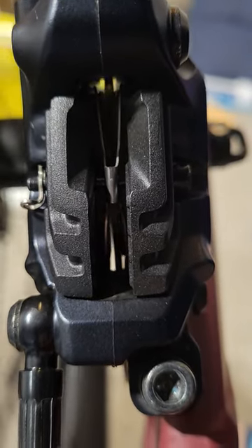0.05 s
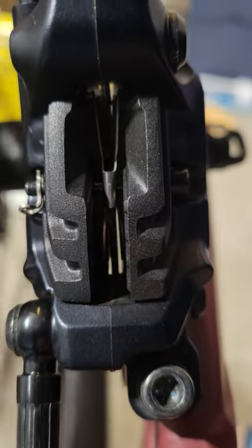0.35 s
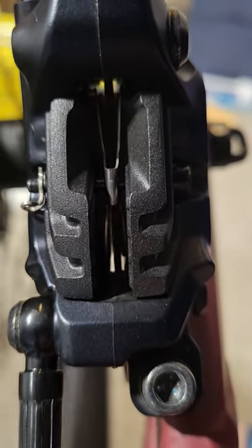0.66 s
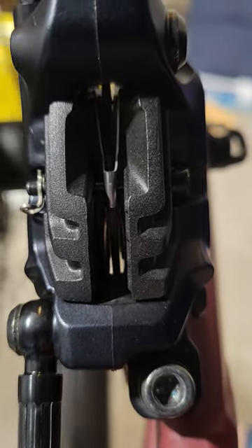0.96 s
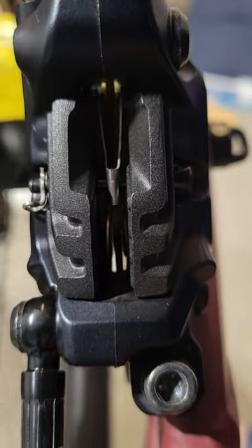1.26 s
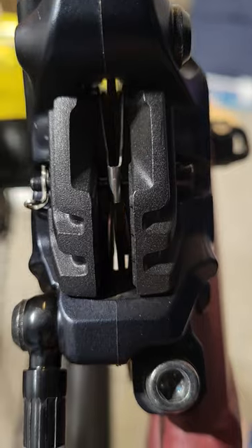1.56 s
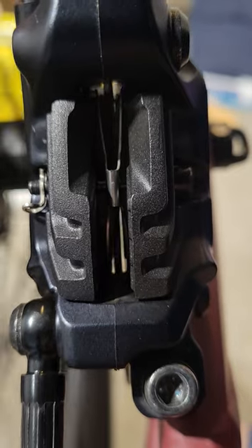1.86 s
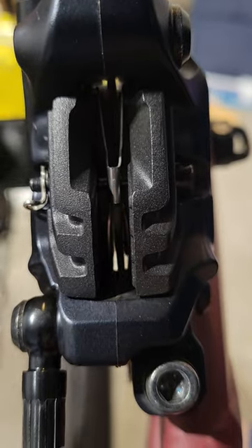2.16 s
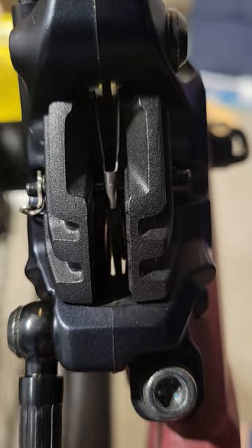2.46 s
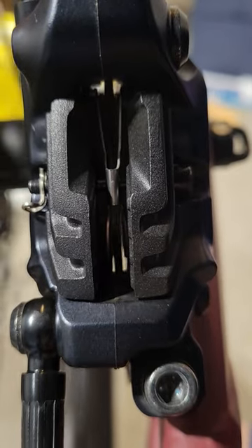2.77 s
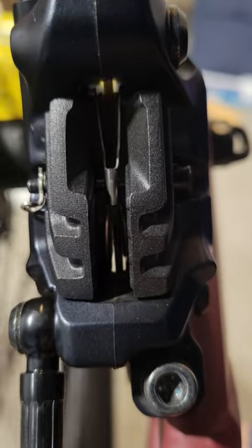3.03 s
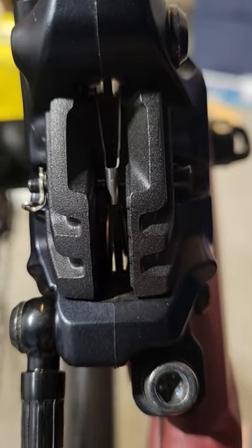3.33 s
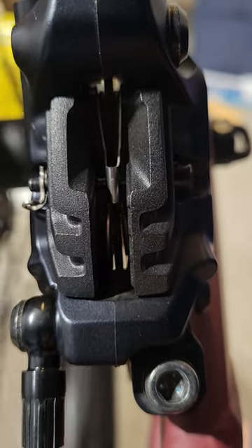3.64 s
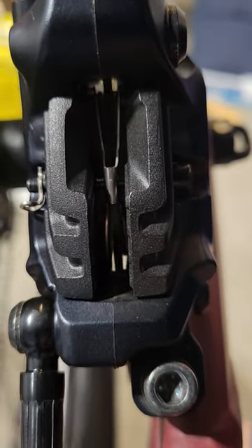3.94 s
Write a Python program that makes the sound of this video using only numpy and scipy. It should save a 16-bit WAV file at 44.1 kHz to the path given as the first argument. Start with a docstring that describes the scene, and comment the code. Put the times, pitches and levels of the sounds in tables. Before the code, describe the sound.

A bicycle freehub ticks rapidly while the brake disc brushes the pads once per turn.

```python
"""A coasting bicycle wheel

A rear wheel slowly loses speed, heard from right beside the brake. Small catches in the hub (pawls)
drop over 18 teeth, each with its own click, in the same pattern on every turn. Once a turn the bent
brake disc brushes the pads with a hiss, and the frame's hum swells. A quiet room lies behind."""
import sys
import numpy as np
from scipy.fft import rfft, irfft, next_fast_len
from scipy.io import wavfile
from scipy.ndimage import map_coordinates

SR = 44100
rng = np.random.default_rng(int(sys.argv[2]) if len(sys.argv) > 2 else 0)


def digitize_waveform(pressure):
    """Quantize a signal to 16-bit integers and store it at the path in sys.argv[1].

    Rows of a 2-D input are taken as channels; values are limited to [-1, 1].
    """
    field = np.atleast_2d(pressure).T
    bounded = np.clip(field, -1, 1)
    quanta = np.round(bounded * 32767).astype(np.int16)
    wavfile.write(sys.argv[1], SR, quanta)


N = 4 * SR
TIME = np.arange(N) / SR
FIRST_CLICK_S, START_CLICKS_PER_S, SLOWING_PER_S2 = .0136, 25.398, 1.312


def amp(db):
    """Turn decibels into a gain."""
    return 10 ** (np.asarray(db) / 20)


def unit(x):
    """Scale to an average power of one."""
    return x / np.sqrt(np.mean(x ** 2) + 1e-20)


def along(points, hz):
    """Read between (Hz, value) points on a log axis."""
    f, v = np.transpose(points)
    return np.interp(np.log(hz + 1), np.log(f + 1), v)


def filtered(x, response):
    """Give each frequency in x the gain and phase of a response."""
    n = x.shape[-1]
    m = next_fast_len(2 * n)
    return irfft(rfft(x, m) * response(np.fft.rfftfreq(m, 1 / SR)), m)[..., :n]


def resonances(modes, f):
    """How an object answers at frequency f. Its modes are the pitches it rings at."""
    return sum((-1) ** k * amp(db) * 1j * f * width / (hz * hz - f * f + 1j * f * width)
               for k, (hz, width, db) in enumerate(modes))


def ringing(modes, low_hz, high_hz):
    """A part's response: its modes between two band edges."""
    def response(f):
        low_cut = f * f / (low_hz ** 2 - f * f + 1j * f * low_hz)
        high_cut = high_hz ** 2 / (high_hz ** 2 - f * f + 1j * f * high_hz)
        return resonances(modes, f) * low_cut * high_cut
    return response


def pan(left_db):
    """Two channel gains, the left louder by left_db."""
    return unit(amp([[left_db / 2], [-left_db / 2]]))


def wobble(per_s):
    """A smooth curve through per_s random values a second."""
    return map_coordinates(rng.standard_normal(int(N * per_s / SR) + 4), [np.arange(N) * per_s / SR])


def tooth_now():
    """How far the wheel is into its turn at each sample, counted in teeth."""
    t = TIME - FIRST_CLICK_S
    return (START_CLICKS_PER_S * t - SLOWING_PER_S2 * t * t / 2) % len(RATCHET_TEETH)


# The room's noise. Each row: frequency in Hz, relative level in dB.
ROOM_COLOUR = [(25, -31), (36, -17), (49, 0), (62, -7), (90, -3.5), (130, -12.5), (250, -17.5), (500, -17),
               (1200, -17), (2500, -10.5), (4500, -15.5), (8000, -33), (16000, -42.5)]
# How alike left and right are. Each row: frequency in Hz, likeness from -1 (opposite) to 1 (same).
ROOM_LIKENESS = [(60, 0.79), (200, 0.62), (400, -0.72), (1200, -0.65), (3000, -0.28)]


def room():
    """A steady low rumble and faint air."""
    def response(f):
        angle = np.arccos(along(ROOM_LIKENESS, f)) / 2
        return amp(along(ROOM_COLOUR, f)) * [np.cos(angle), np.sin(angle)]
    mid, side = filtered(rng.standard_normal((2, N)), response)
    return amp(-52.5) * pan(left_db=1) * unit(np.array([mid + side, mid - side]))


# The frame's low modes. Each row: pitch in Hz, width in Hz, relative level in dB.
HUM_MODES = [(165.3, 34, 2), (203, 32, 1.5), (283, 37.5, 0.5), (332.5, 53, -1.5), (373, 34, 0),
             (433, 27, -0.5)]


def frame_hum(level_db=-67, swing_db=2, peak_tooth=7.5):
    """Low resonances of the frame swell and fade with each turn."""
    shared, own = rng.standard_normal(N), rng.standard_normal((2, N))
    hum = unit(filtered(shared + .58 * own, lambda f: resonances(HUM_MODES, f)))
    swell = np.cos(2 * np.pi * (tooth_now() - peak_tooth) / len(RATCHET_TEETH))
    return pan(left_db=1.5) * hum * amp(level_db + swing_db * swell)


# Clear tones in the hum. Each row: pitch in Hz, rough half length of a swell in seconds.
HUM_TONES = [(165, 0.18), (328, 0.16), (415, 0.09), (574, .09)]
# Their swells. Each row: peak time in seconds, then each tone's level in dB, lowest tone first.
TONE_SWELLS = [(.45, -70, -70.5, -67, -74), (1.16, -62, -70.5, -69.5, -69.5), (1.93, -64, -75, -66.5, -81),
               (2.76, -69.5, -63, -65.5, -70.5), (3.59, -63, -70.5, -67.5, -70)]


def frame_tones(waver_hz=2.283):
    """Clear low tones in the frame rise and fall, differently on each turn."""
    out = np.zeros(N)
    for k, (hz, swell_s) in enumerate(HUM_TONES):
        swell = sum(amp(db[k]) * np.exp(-((TIME - at) / swell_s) ** 2 / 2) for at, *db in TONE_SWELLS)
        pitch = hz + waver_hz * wobble(per_s=4)
        out += np.sqrt(2) * swell * np.sin(2 * np.pi * np.cumsum(pitch) / SR)
    return pan(left_db=6.5) * out


# The disc's brushing through one turn. Each row: position in teeth, level in dB.
RUB_LEVELS = [(0, -59.5), (2, -48), (5.3, -51), (6.4, -51), (7.6, -65), (10.5, -95), (14, -81), (16.5, -78),
              (18, -50.5)]
# The pads' hiss. Each row: frequency in Hz, relative level in dB.
HISS_COLOUR = [(1500, -19), (2400, 13), (3300, -5.5), (5000, 5.5), (7000, -12), (8300, -10), (10500, -9.5),
               (13500, -0.5), (16000, -8.5)]
# Where the hiss sits. Each row: frequency in Hz, left minus right in dB.
HISS_PAN = [(2500, 11), (5000, 2), (10000, -8.5)]
# The brake disc's modes. Each row: pitch in Hz, width in Hz, relative level in dB.
DISC_MODES = [(5940, 100, -1), (6905, 217, 8), (7840, 33, 4), (9640, 1420, -2.5), (11180, 140, 0),
              (11640, 140, 1.5), (13600, 1800, 1.5), (15300, 590, 2)]
# Slight dips in the rub and the disc's bright ticks. Each row: time in seconds, change in dB.
TREBLE_DIPS = [(.1, -0.5), (.9, -0.5), (1.25, -1), (1.65, -0.5), (2.45, -1), (3.25, -1), (3.9, -1)]


def brake_rub(flicker_db=1, grains_per_s=1500, grain_db=-4.5):
    """The disc's high spot brushes the pads once a turn: a hiss, and tiny catches that ring the disc."""
    rough_noise = rng.standard_normal((2, N)) * amp(flicker_db * wobble(per_s=350))
    sides = np.array([[.5], [-.5]])
    hiss = unit(filtered(rough_noise, lambda f: amp(along(HISS_COLOUR, f) + sides * along(HISS_PAN, f))))
    catches = (rng.random((2, N)) < grains_per_s / SR) * rng.standard_normal((2, N))
    grains = unit(filtered(catches, ringing(DISC_MODES, 5860, 17000)))
    rub_db = np.interp(tooth_now(), *np.transpose(RUB_LEVELS))
    dip_db = np.interp(TIME, *np.transpose(TREBLE_DIPS))
    return (hiss + amp(grain_db) * pan(left_db=-2.5) * grains) * amp(rub_db + dip_db)


def pawl_drops(scatter_s=.0003):
    """The time and tooth of every drop as the wheel slows."""
    end = N / SR - FIRST_CLICK_S
    count = np.arange(int(START_CLICKS_PER_S * end - SLOWING_PER_S2 * end * end / 2) + 1)
    clicks_per_s = np.sqrt(START_CLICKS_PER_S ** 2 - 2 * SLOWING_PER_S2 * count)
    times = FIRST_CLICK_S + (START_CLICKS_PER_S - clicks_per_s) / SLOWING_PER_S2
    return times + scatter_s * rng.standard_normal(len(count)), count % len(RATCHET_TEETH)


def even(hits):
    """Give every hit the same power over its first 10 ms."""
    return hits / np.sqrt(np.mean(hits[..., :SR // 100] ** 2, axis=(1, 2), keepdims=True))


def strikes(times, tooth, level_db, colour, chatter_s, echo_db, echo_s, tail_db, tail_s, left_db):
    """Each drop is a brief chatter of contacts, then echoes from the wheel and a faint tail."""
    right_delay_s, scatter_db = .00037, .83
    repeats = .53  # share of a tooth's chatter that returns each turn
    t = np.arange(SR // 6) / SR
    habit = rng.standard_normal((len(RATCHET_TEETH), 1, len(t)))[tooth]
    chatter = np.sqrt(repeats) * habit + np.sqrt(1 - repeats) * rng.standard_normal(habit.shape)
    direct = filtered(chatter * (t / chatter_s) ** 2 * np.exp(-t / chatter_s), colour)
    direct = np.concatenate([direct, np.roll(direct, round(right_delay_s * SR), axis=-1)], axis=1)
    rise = 1 - np.exp(-(t / (2 * chatter_s)) ** 2)
    decay = np.exp(-t / echo_s) + amp(tail_db) * np.exp(-t / tail_s)
    echoes = filtered(rise * decay * rng.standard_normal(direct.shape), colour)
    level_db = level_db + scatter_db * rng.standard_normal(len(times))
    starts = times - 2 * chatter_s  # so the chatter peaks on time
    out = np.zeros((2, N + SR))
    for start, db, click, echo in zip(starts, level_db, even(direct), even(echoes)):
        out[:, max(round(start * SR), 0):][:, :len(t)] += amp(db) * (click + amp(echo_db) * echo)
    return pan(left_db) * out[:, :N]


# Long-ringing modes of the steel. Each row: pitch in Hz, width in Hz, relative level in dB.
ZING_MODES = [(4420, 140, 1), (4700, 76, 1.5), (4980, 72, -5)]


def zing(on_tooth=13, start_db=-44, fade_db_per_s=2.5):
    """Once a turn a drop sets the steel ringing for longer, more weakly as the wheel slows."""
    times, tooth = pawl_drops()
    hit = tooth == on_tooth
    level_db = start_db - fade_db_per_s * times[hit]
    return strikes(times[hit] + .0025, tooth[hit], level_db, ringing(ZING_MODES, 4050, 5530),
                   chatter_s=.0012, echo_db=-3, echo_s=.016, tail_db=-3, tail_s=.097, left_db=10)


def favouring(part, centre_hz, sharpness):
    """A part's response, with each drop favouring the modes near its own centre pitch."""
    hz = centre_hz[:, None, None]
    return lambda f: part(f) * f / (hz * hz - f * f + 1j * f * hz / sharpness)


# The hub's teeth. Each row: clack delay in ms, ring delay in ms, ring level in dB, ring centre in Hz,
# ring drift in dB a second, clack level in dB, clack centre in Hz, tick level in dB, knock level in dB.
# Delays and levels are relative: freehub() shifts each part as a whole.
RATCHET_TEETH = [(3.5, 2.9, -33, 2510, 0.43, -39, 4040, -46.5, -60.5),
                 (1.245, 2.086, -35, 2220, 2.5, -39, 4300, -42.5, -62.5),
                 (1.9, 1.18, -36.5, 2120, -1.4, -36.5, 4600, -40.5, -60),
                 (0.88, 2.35, -32, 2700, 1.1, -39, 4400, -37, -62.5),
                 (1.286, 1.745, -41, 2600, .3, -36.5, 4100, -44, -64.5),
                 (1.52, 2.2, -36.5, 2810, -0.3, -40, 3800, -37, -65),
                 (.7, 2.33, -39, 3000, 2, -38.5, 3500, -51, -63),
                 (1.9, 1.39, -41, 2140, -1.3, -40.5, 1300, -54.5, -62),
                 (1.56, 2.9, -36.5, 2500, -0.2, -40, 4460, -52, -60),
                 (2.3, 2.28, -41, 2140, -2.2, -43.5, 5050, -58, -60),
                 (.6, 2.475, -44, 3030, -1, -45, 1600, -63, -59.5),
                 (2.2, 2.8, -37.5, 2280, 1.3, -39, 4100, -62, -56.5),
                 (1.156, 3.5, -38, 2240, -1.7, -44, 4400, -57.5, -58.5),
                 (0.883, 3.3, -39, 2450, -0.5, -39, 4600, -50, -56),
                 (3.2, 3, -40, 3100, .5, -39.5, 5000, -50.5, -71.5),
                 (2.1, 3.3, -46, 2700, -1.2, -43, 4800, -54, -62.5),
                 (3.1, 3.5, -41, 2420, -1.2, -45, 4100, -48.5, -58.5),
                 (1.7, 3.5, -37, 2350, 2.1, -39, 4450, -44, -61)]
# What a click rings: the hub, its steel, the frame and the frame's thin tubes.
# Each row: pitch in Hz, width in Hz, relative level in dB.
HUB_MODES = [(1873, 55, -3.5), (2108, 24.6, 0), (2446, 252, -3), (2658, 110, 1), (3073, 180, -7.5)]
STEEL_MODES = [(3245, 37, 11), (3250, 1500, -3.5), (3870, 68, 6.5), (4345, 112, 0), (4727, 140, 0.5),
               (4970, 98, -3), (5510, 330, -6), (6104, 284, -3.5), (7180, 58, -1)]
FRAME_MODES = [(573, 24, 2.5), (715, 16, -9.5)]
TUBE_MODES = [(796, 37, -2.5), (1038, 103, 2.5), (1330, 240, -1.5), (1678, 280, 2.5)]
# Drops that land harder or softer than usual. Each row: time in seconds, change of the ring in dB.
RING_ACCENTS = [(.13, 3.5), (.74, 2), (.94, 1), (1.49, 3.5), (1.70, 2.5), (2.86, -6), (3.47, 3), (3.86, 9)]


def freehub():
    """Each drop gives a hub ring, a steel clack, a bright tick and a knock in the frame and its tubes."""
    times, tooth = pawl_drops()
    (clack_ms, ring_ms, ring_db, ring_hz, ring_drift,
     clack_db, clack_hz, tick_db, knock_db) = np.array(RATCHET_TEETH)[tooth].T
    clack_at = times + clack_ms / 1000 - .002
    ring_at = times + ring_ms / 1000 - .003
    ring_db = ring_db + ring_drift * (times - times.mean())
    for at, extra_db in RING_ACCENTS:
        ring_db[np.argmin(abs(times - at))] += extra_db
    tick_db = tick_db + np.interp(times, *np.transpose(TREBLE_DIPS))
    steel = favouring(ringing(STEEL_MODES, 2830, 7800), clack_hz, sharpness=1.66)
    hub = favouring(ringing(HUB_MODES, 1650, 3570), ring_hz, sharpness=4.4)
    ring = strikes(ring_at, tooth, ring_db - 5.5, hub,
                   chatter_s=.000897, echo_db=-5.5, echo_s=.015, tail_db=-12.5, tail_s=.057, left_db=5.5)
    clack = strikes(clack_at, tooth, clack_db - 4.5, steel,
                    chatter_s=.0012, echo_db=-4.5, echo_s=.0096, tail_db=-10.5, tail_s=.051, left_db=9.5)
    tick = strikes(times + .0015, tooth, tick_db - 6, ringing(DISC_MODES, 6070, 16900),
                   chatter_s=.00098, echo_db=2.5, echo_s=.0039, tail_db=-27.5, tail_s=.071, left_db=-3)
    knock = strikes(clack_at, tooth, knock_db - 2, ringing(FRAME_MODES, 426, 1930),
                    chatter_s=.001403, echo_db=-6, echo_s=.0098, tail_db=-13.5, tail_s=.061, left_db=-24)
    tubes = strikes(clack_at, tooth, clack_db - 17.5, ringing(TUBE_MODES, 736, 2000),
                    chatter_s=.001621, echo_db=-4.5, echo_s=.008, tail_db=-6, tail_s=.072, left_db=1.5)
    return ring + clack + tick + knock + tubes


def scene():
    """The wheel, brake and frame in the quiet room."""
    return freehub() + zing() + brake_rub() + frame_hum() + frame_tones() + room()


def record(dry):
    """Cut away the treble above 16200 Hz."""
    return filtered(dry, lambda f: 1 / (1 + (f / 16200) ** 200))


dry = scene()
out = record(dry)
digitize_waveform(out)
```